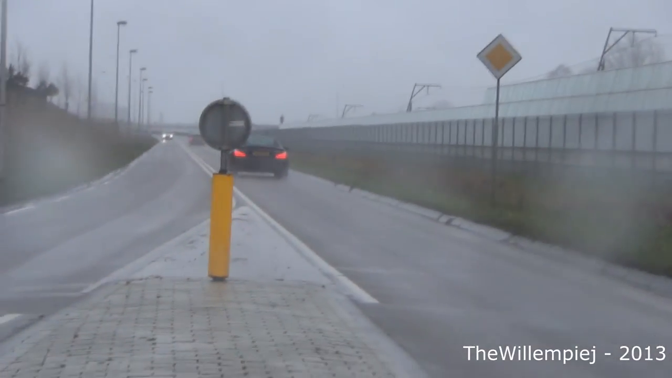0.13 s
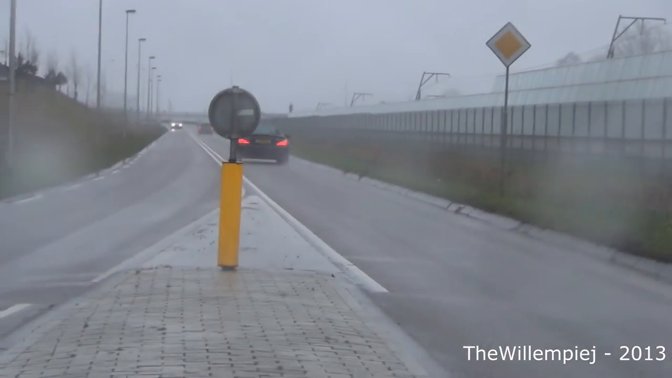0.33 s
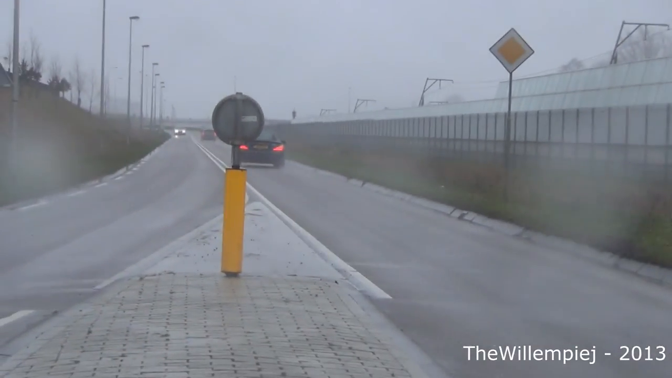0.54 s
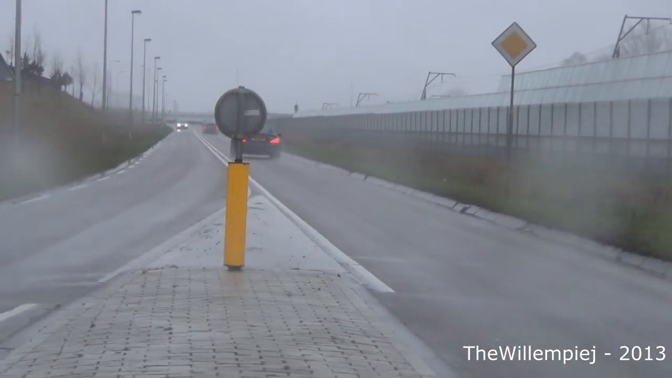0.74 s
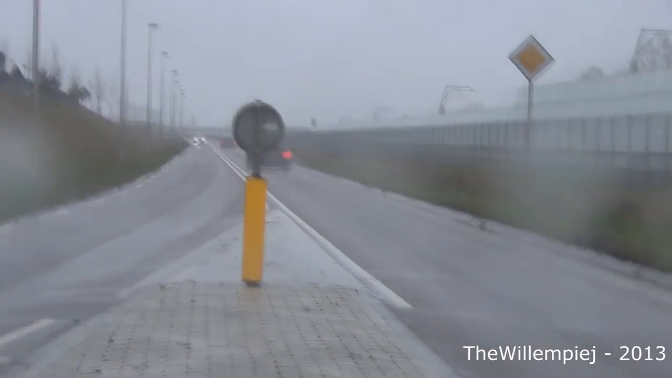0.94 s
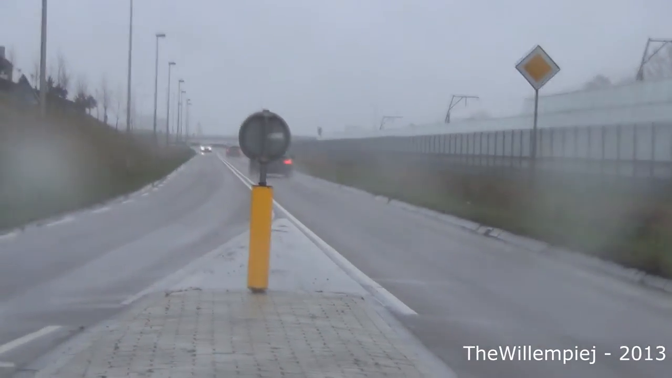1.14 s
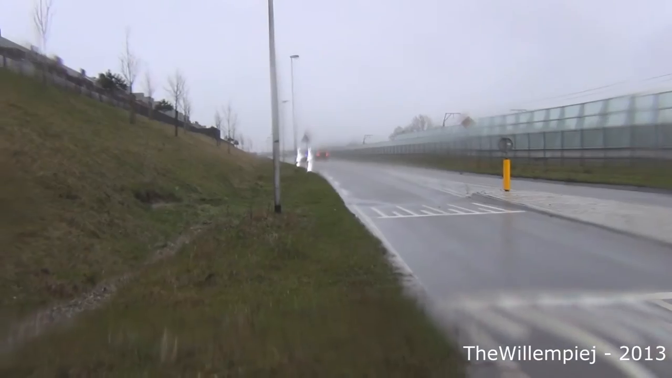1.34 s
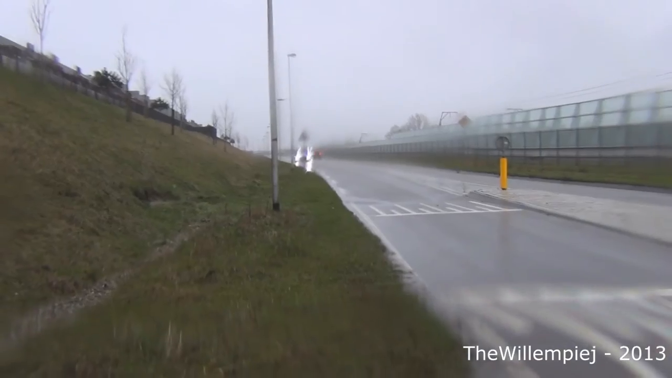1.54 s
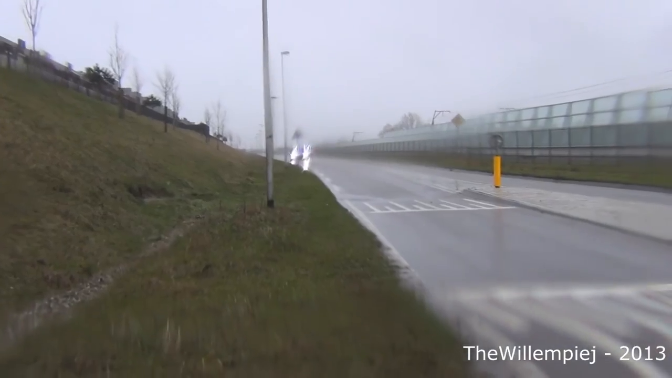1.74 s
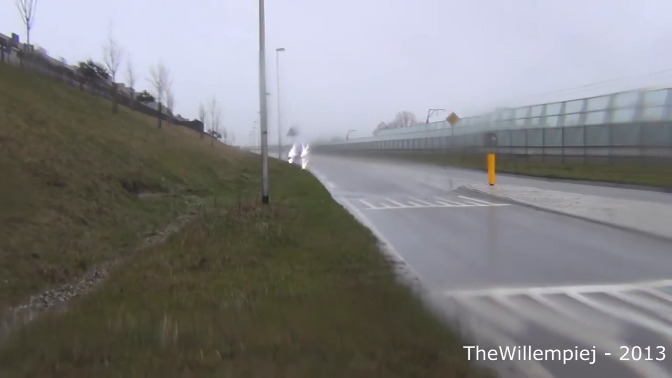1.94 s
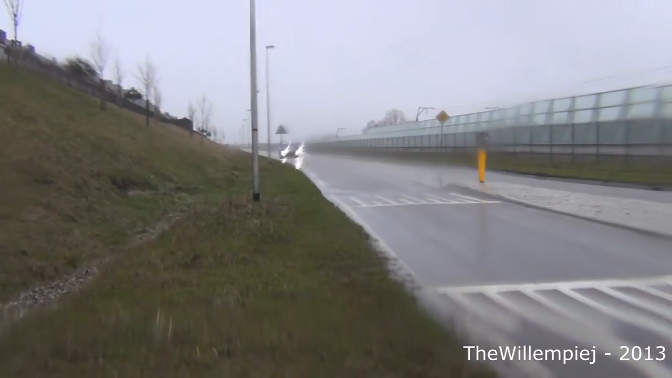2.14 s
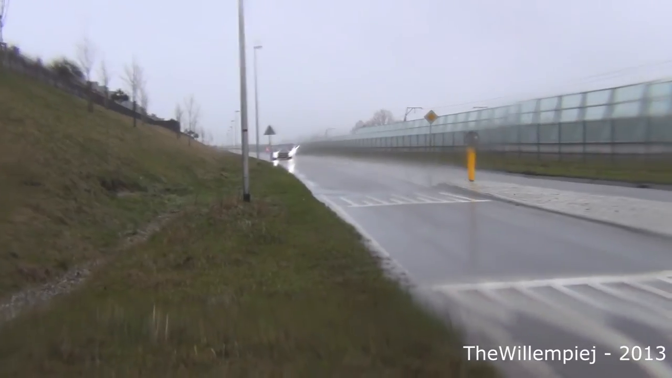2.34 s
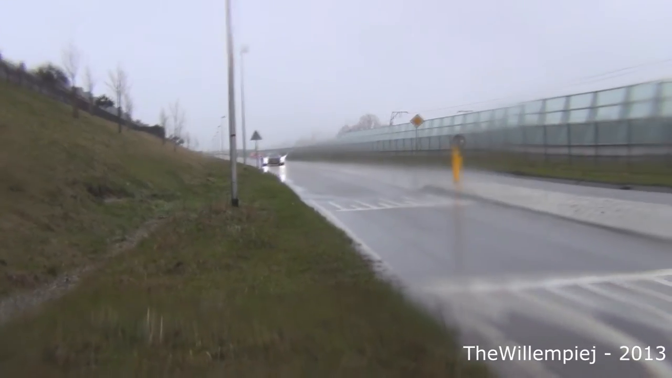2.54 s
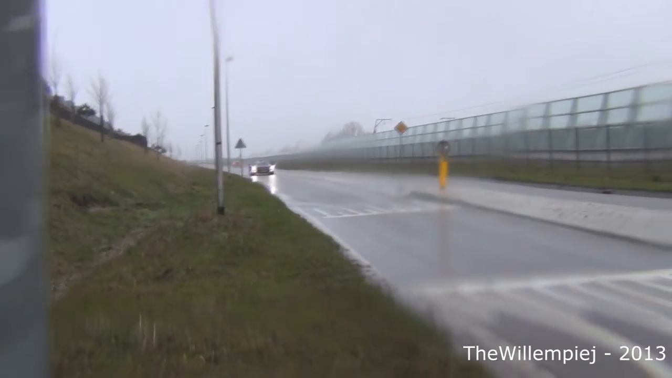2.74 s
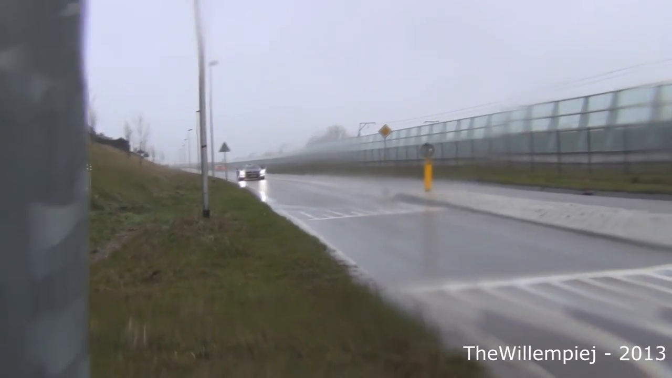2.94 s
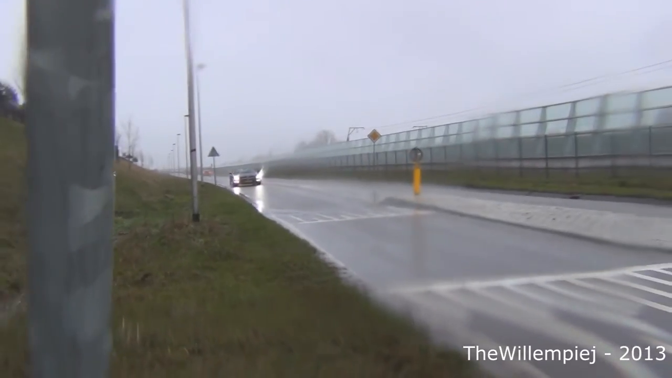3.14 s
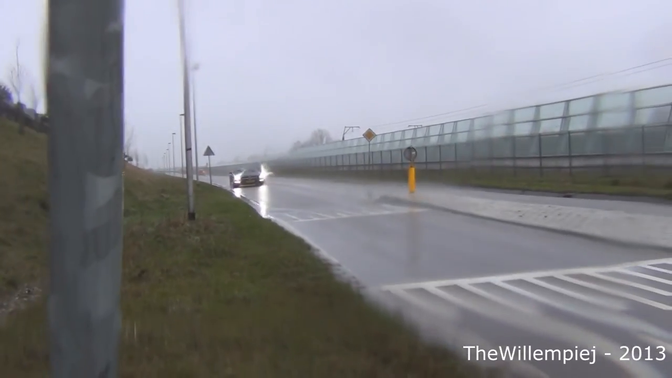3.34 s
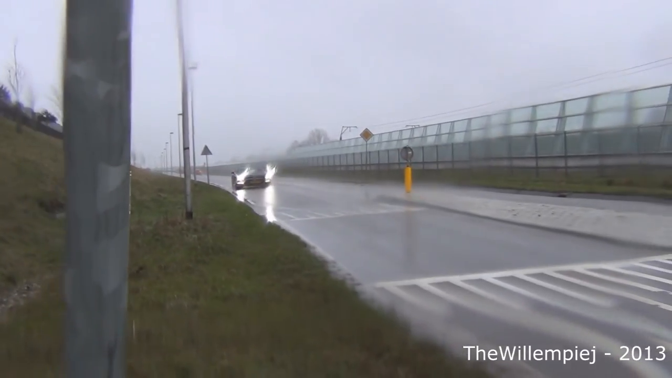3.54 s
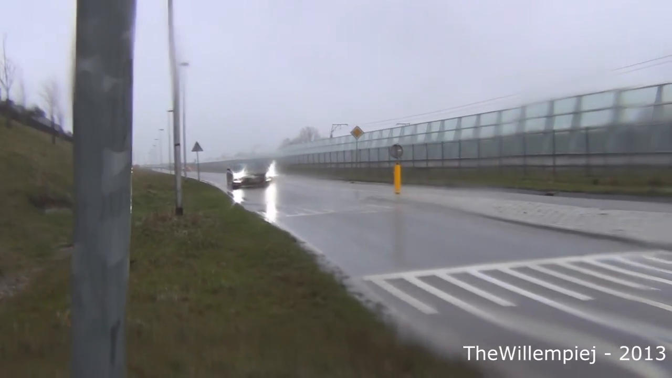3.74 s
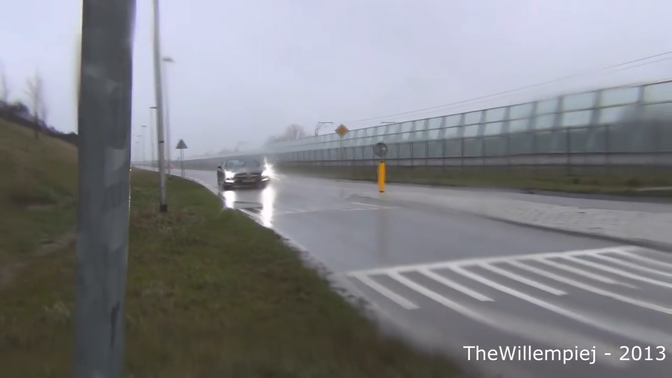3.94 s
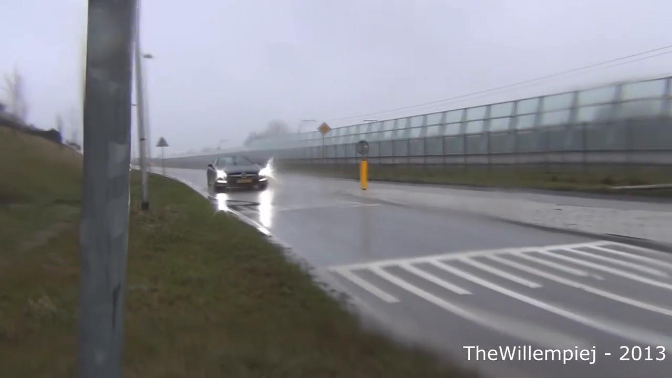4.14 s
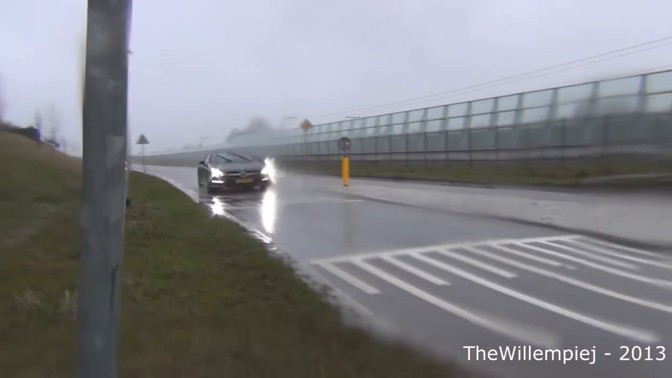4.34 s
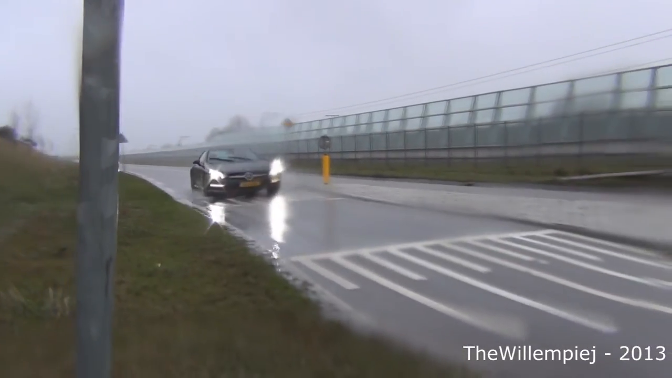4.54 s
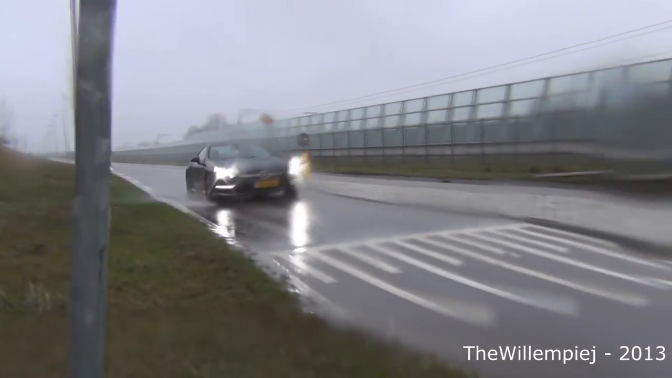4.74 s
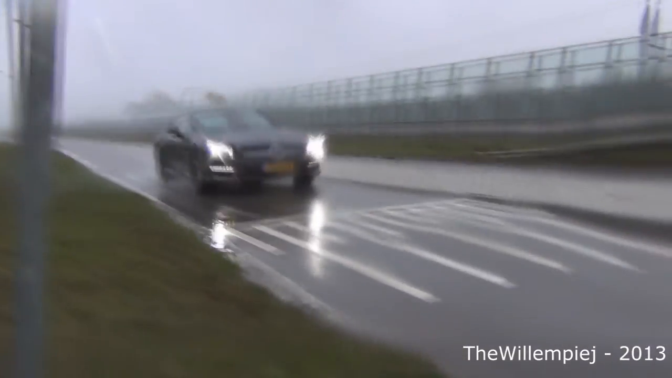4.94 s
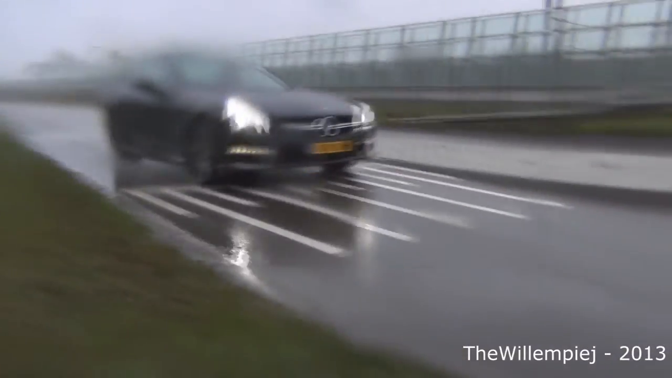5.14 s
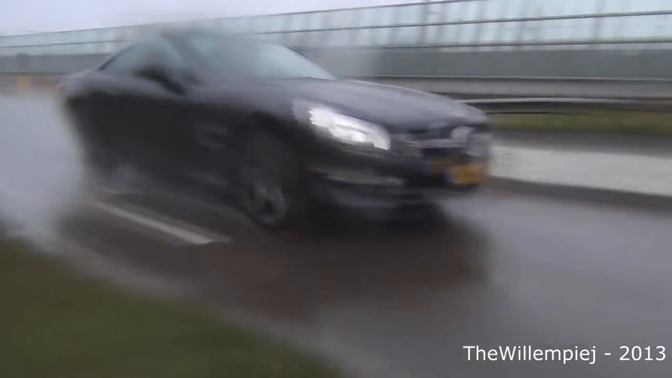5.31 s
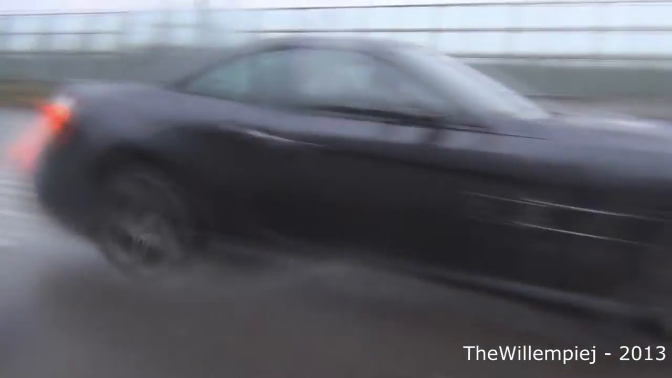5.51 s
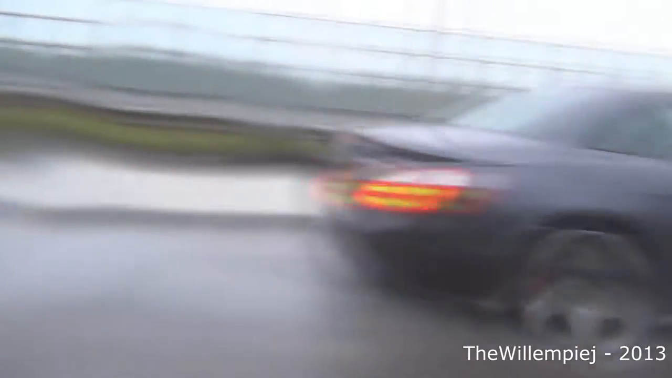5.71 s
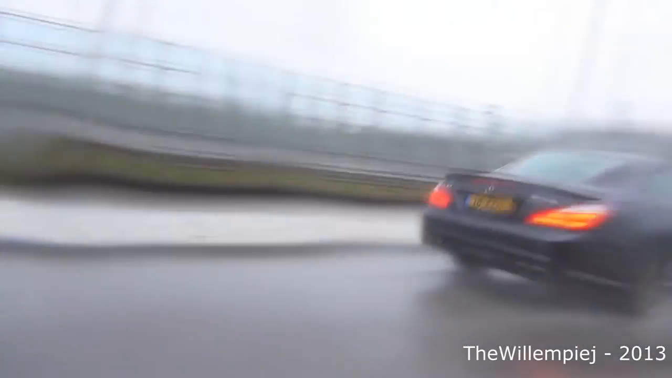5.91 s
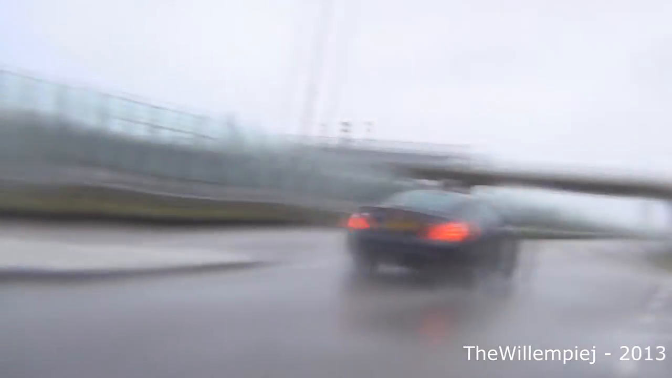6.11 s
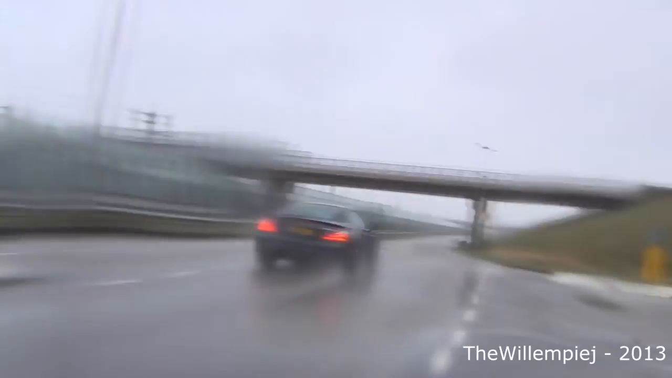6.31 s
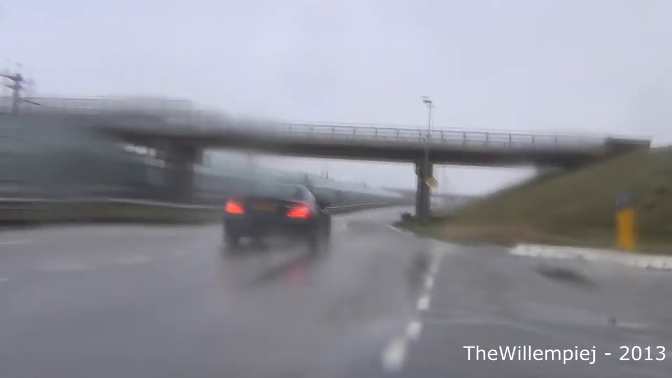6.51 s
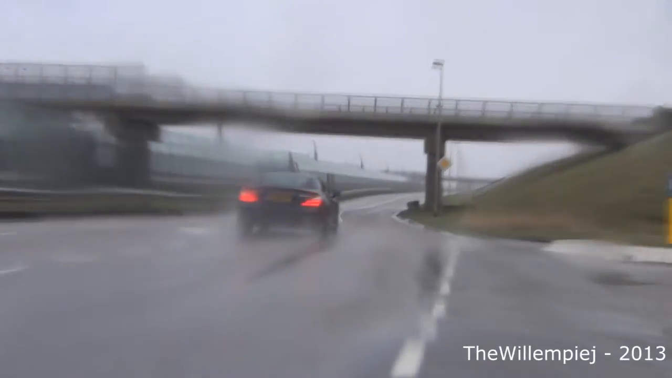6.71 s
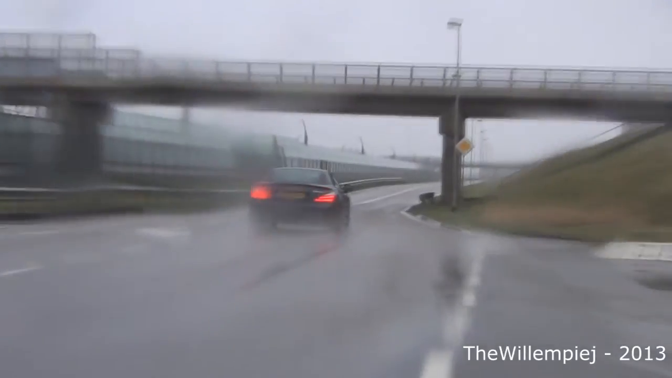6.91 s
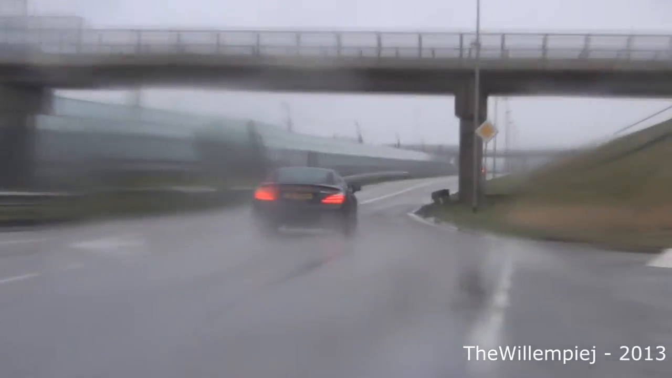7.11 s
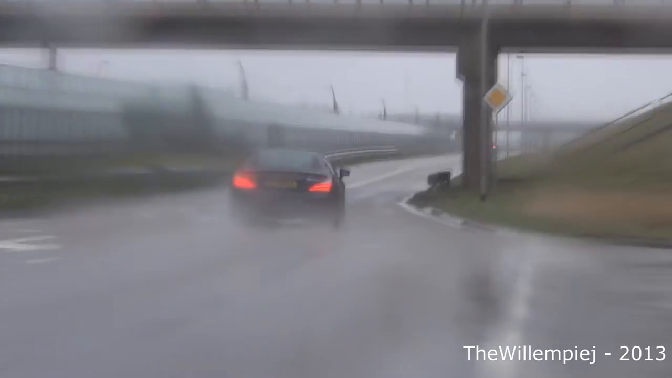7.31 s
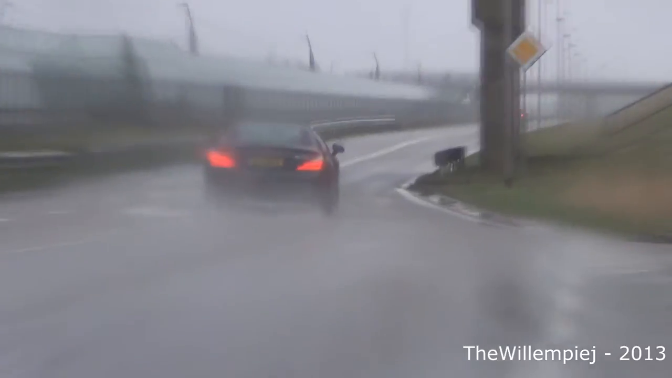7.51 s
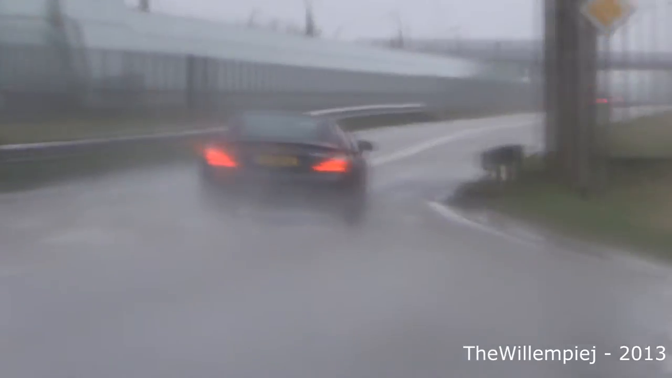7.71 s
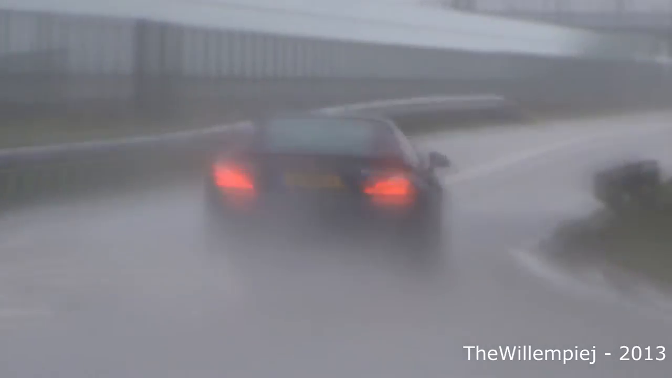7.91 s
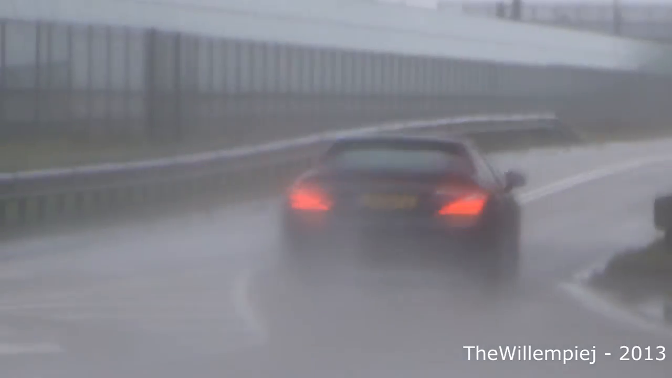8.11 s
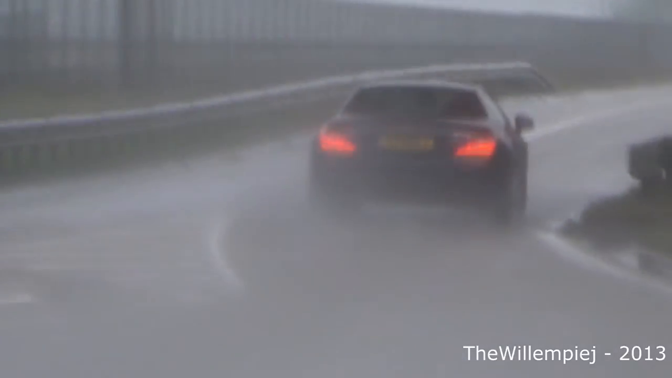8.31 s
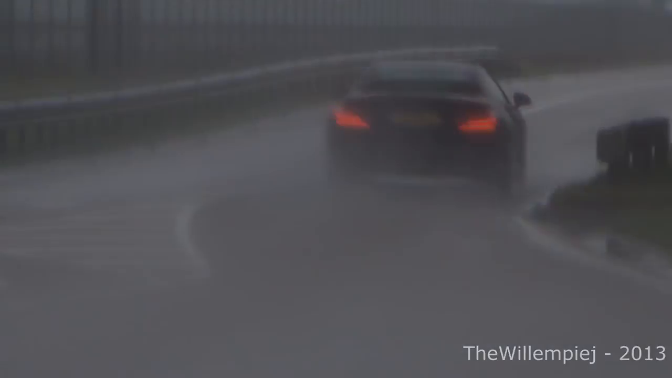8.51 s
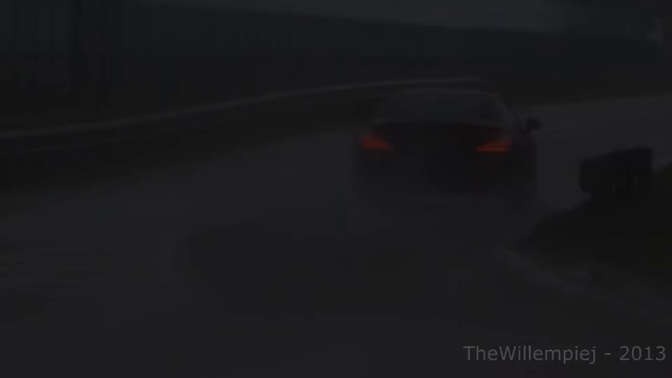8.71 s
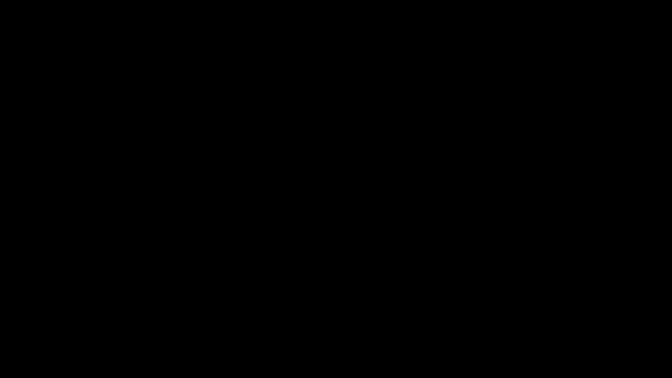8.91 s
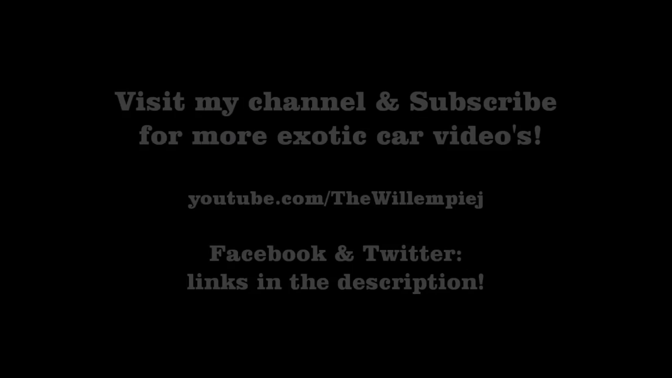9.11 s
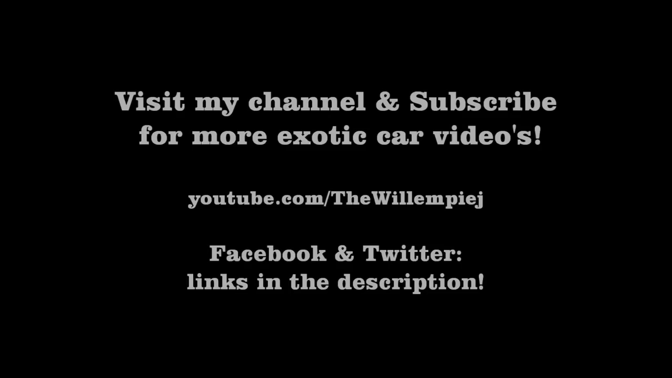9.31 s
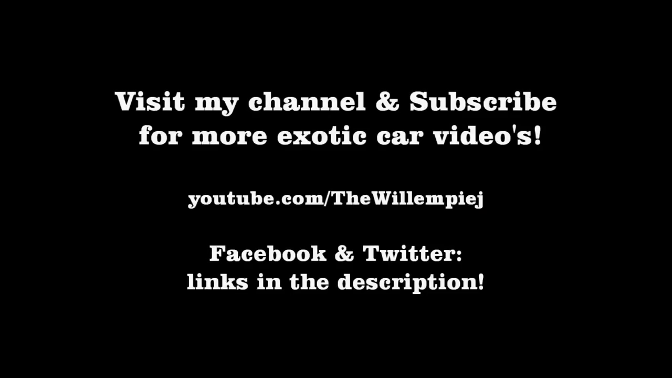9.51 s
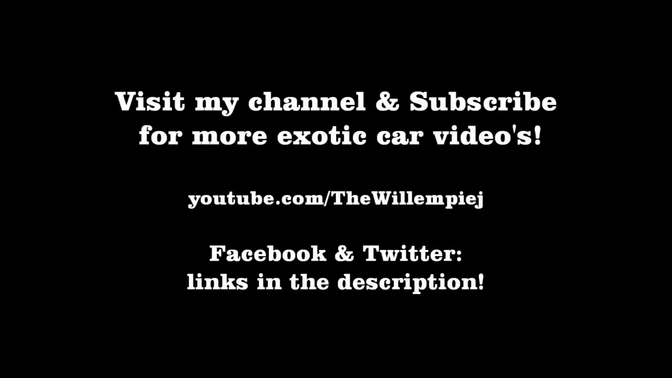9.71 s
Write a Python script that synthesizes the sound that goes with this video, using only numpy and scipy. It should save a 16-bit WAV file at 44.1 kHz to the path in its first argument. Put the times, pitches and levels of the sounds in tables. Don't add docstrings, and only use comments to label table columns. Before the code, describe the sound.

Open wet roadside, light rain, hand-held microphone. From 0 to 1.3 s a powerful eight-cylinder car is already leaving: broad tyre roar and hissing spray, slightly right, with a rough throaty exhaust that dips, then swells. At 1.3 s it cuts abruptly to a much quieter scene: distant wet tyre hiss, low traffic hum and sparse raindrop ticks until about 3.2 s. Wind buffets thump and flutter from 2.6 to 4.7 s while the tyres slowly grow, with a splash at 3.5. A sharp splash comes at 4.7; roar and spray peak near 5.5 s, then a short tyre scrub and rising, stuttering exhaust growl at 5.6-6.3 as wheelspin is caught. Tyre noise drops by 6.7. The car pulls away, splashing at 7.0-7.5 with one hard drop tick at 7.4; rasping revs climb to 8.1, fall with a shift, and fade until a sudden stop at 9 s, then silence.

```python
import sys
import numpy as np
from scipy import signal
from scipy.fft import rfft, irfft, next_fast_len
from scipy.io import wavfile
from scipy.ndimage import uniform_filter1d, map_coordinates

SR = 44100
rng = np.random.default_rng(int(sys.argv[2]) if len(sys.argv) > 2 else 0)


def ratio(d):
    e = np.asarray(d, float) / 20
    return 10 ** e


def log_audio(samples):
    frames = np.atleast_2d(samples).T
    limited = np.clip(frames, -1, 1)
    pcm = np.round(limited * 32767).astype(np.int16)
    wavfile.write(sys.argv[1], SR, pcm)


N = 429970
CHANGE_S, END_S = 1.304, 9.012

# [t/s, tread roar level/dB, spray over roar/dB, left-right bearing/dB]
RECEDING = [
    (0, -22, -4, 1.5),
    (.45, -22.5, -3, 4),
    (.78, -23, -2.5, 6.5),
    (.88, -21.5, -3.5, 8),
    (1.17, -18.5, -5.5, 7.5),
    (1.302, -19.5, -5, 6.5),
]
DRIVE_BY = [(1.305, -32, -8, -0.5), (1.54, -34, -9.5, 0.5), (2.7, -32, -5.5, 1.5), (3.82, -29, -9, 1),
            (4.35, -27.5, -3.5, 2), (4.625, -23.5, -5, 2.5), (4.64, -23, -3, 1.5), (5.02, -20, -1, 2.5),
            (5.53, -18.5, 0.5, 2.5), (5.64, -20, -1.5, 3), (6.05, -19.5, -0.5, -5), (6.45, -22.5, -3, 0),
            (6.71, -28.5, -6, -0.5), (7.2, -28, -4, 0.5), (7.96, -29, -9.5, 1.5), (8.09, -24, -7.5, 0),
            (8.3, -32, -6, 1), (9.012, -36.5, -9, -1)]
# [t/s, extra spray level/dB, half length/s]
PUDDLES = [
    (.62, 2.5, 0.17),
    (1.002, 3, .04),
    (1.276, 2, .02),
    (3.501, 5, .17),
    (4.049, 1, 0.16),
    (4.668, 5, 0.014),
    (7.022, 7, 0.085),
    (7.418, 7, .06),
    (7.55, 6, .06),
]
PUDDLE_ROAR = .35
# [t/s, f/Hz, level/dB]
GROUND = [(0, 1290, 1), (.63, 1450, 4), (1.302, 1527, 0), (1.43, 1600, 4), (2.12, 1635, 9),
          (2.74, 1870, 13.5), (3.24, 2010, 8), (3.77, 1510, 3.5), (4.5, 1647, 9.5), (5.25, 1814, 5),
          (5.41, 1530, 3), (5.62, 2154, 3.5), (6.01, 1540, 2), (6.71, 1440, 1), (7.4, 1740, 2.5),
          (7.9, 2300, 6), (8.3, 1500, 6), (9.012, 1465, 4.5)]
TILT_DB, TILT_PER_DB = -0.86, 0.25
# [t/s, share]
WALL = [(0, 0.13), (1.3, 0.07), (1.6, 0.17), (3.2, 0.18), (3.8, 0.063), (4.5, 0.083), (5.2, 0.059),
        (9, 0.047)]
WALL_S = 0.002464
# [f/Hz, level/dB per Hz]
RUMBLE = [(41, -60), (70, -26.5), (177, -9), (363, -8.5), (593, -5.5), (792, -21.5), (900, -6),
          (1170, -26.5), (1980, -120)]
ROAR = [(290, -47.5), (500, -16.5), (629, -3.5), (837, -0.5), (1240, -2.5), (1610, -4), (1840, -6),
        (2690, -3), (3540, -11.5), (4500, -11.5), (5850, -18), (9900, -120)]
SPRAY = [(1940, -28.5), (3300, -4), (4330, -6), (5300, -1), (7300, 0), (10500, -17.5), (13600, -40.5),
         (22000, -120)]
MIST = [(5290, -25), (9000, -2), (14700, -26.5), (15600, -37)]
# [f/Hz, left-right likeness]
ALIKE = [(60, 0.64), (130, 0.91), (290, 0.89), (640, 1), (1410, 0.97), (3100, 1), (6820, 0.94), (15000, 1)]
# (t/s, half length/s, f/Hz, width/Hz, level/dB)
SLIP = (5.635, .045, 2700, 250, -20)
RUMBLE_DB, RUMBLE_BEHIND_DB = -21.5, 9
RUMBLE_FIRST_DB = -5
SPRAY_FULL_DB, SPRAY_PAN = -25.5, .4
SPRAY_HZ, SPRAY_HZ_PER_DB = 6860, 27.5
SPRAY_PEAK_DB = (1, 5.5)
MIST_DB, MIST_GROWS = -11, 1.37
MIST_AHEAD_DB, MIST_FIRST_DB = 4.5, -4.5
ABREAST_S, TURN_S = 5.58, .06

# [t/s, cycle f/Hz, tailpipe level/dB, tailpipe note f/Hz, roughness 0-1, high when firing is cut]
LEAVING = [
    (0, 24.82, -31, 585, 0.44),
    (.4, 25.63, -40, 584, 0.39),
    (.9, 27.38, -36, 578, 0.18),
    (1.1, 28.6, -26.5, 584.4, .3),
    (1.302, 29.34, -21.5, 585, 0.3),
]
PASSING = [(5.2, 28, -46, 657, .08), (5.28, 27.82, -31, 652, .08), (5.46, 28.2, -25.5, 655, 0.095),
           (5.531, 30.3, -37.5, 657, .2), (5.63, 33.44, -21, 660.2, .65), (5.81, 24.34, -17, 640, .55),
           (5.88, 25.49, -31.5, 619.6, 0.62), (5.96, 27.64, -24, 642, 0.445),
           (6.02, 25.2, -23.5, 657.6, 0.39), (6.16, 26.95, -22.5, 627, 0.35),
           (6.28, 22.93, -30, 590.4, 0.22), (6.36, 22.9, -36.5, 570, 0.36)]
PULLING = [(6.6, 23.1, -52, 496, 0.32), (6.92, 24.43, -34, 520, 0.57), (7.3, 26, -35, 537, 0.31),
           (7.4, 26.9, -24.5, 553, 0.31), (7.62, 27.77, -30, 568, .25), (7.8, 29.38, -26, 597.7, 0.27),
           (7.94, 31.9, -28.5, 621, 0.29), (8.0, 34.1, -25.5, 560.5, 0.56), (8.09, 35.96, -27.5, 550, .55),
           (8.18, 33.46, -27, 557, 0.59), (8.31, 24.3, -45, 574, 0.43), (9.012, 22.87, -41.5, 598, 0.37)]
# [multiple of the cycle, level/dB]
ORDER = [(4, -16.5), (6, -6.5), (7, -8.5), (9, -11.5), (10, -4), (12, -6.5), (13, -7.5), (14, -3.5),
         (15, -8), (16, -7)]
# [t/s, rasp level/dB, firing tone level/dB]
EXHAUST = [(0, -30, -63), (.9, -33.5, -48), (1.302, -35, -51), (1.306, -90, -97), (5.15, -63.5, -56),
           (5.44, -63, -64), (5.65, -37, -44), (5.85, -36, -49), (6.0, -40.5, -40.5), (6.27, -33, -35.5),
           (6.7, -36.5, -46), (7.3, -34, -52), (7.65, -31, -44), (7.98, -28.5, -49), (8.09, -28.5, -37),
           (8.3, -39.5, -53), (9.012, -47.5, -56)]
# [f/Hz, width/Hz, level/dB]
RASP = [(976, 170, 5), (1476, 170, 4.5), (2520, 120, 1.5)]
# [t/s, f/Hz, level/dB]
BANK = [
    (5.35, 102.5, -62),
    (5.45, 105, -55),
    (5.63, 133, -48),
    (5.82, 96.1, -50),
]
# [t/s, f/Hz, level/dB]
INTAKE = [
    (5.2, 281, -48),
    (5.26, 280, -42),
    (5.43, 281, -43),
    (5.48, 282, -49),
]
# (t/s, half length/s, level/dB)
SIDE_ON = (5.73, .13, 5.1)
WIDTH_HZ = 120
LOW_DB, LOW_ROUGH_DB = -9, 4.5
THUD_DB = -9.5

# [t/s, level/dB, brightness/dB]
GUSTS = [(0.873, -23, 6), (2.555, -31.5, -10), (2.663, -27.5, -2), (2.684, -25, 7), (2.913, -23.5, -1),
         (3.011, -22, -5), (3.077, -30, 0), (3.129, -23.5, 1), (3.146, -27, 3), (3.209, -38.5, -18),
         (3.356, -25, -7), (3.377, -35, -4), (3.546, -28, 6), (3.581, -24, -6), (3.681, -28, -1),
         (3.829, -26, 6), (3.859, -26, -8), (3.909, -20.5, 2.5), (3.97, -22, 8), (4.05, -32, 6),
         (4.088, -26.5, 6), (4.144, -25, 6), (4.183, -22.5, -1), (4.267, -24, -4), (4.282, -18.5, 6),
         (4.302, -28.5, 6), (4.475, -30.5, 6), (4.5, -22.5, -5), (4.592, -21.5, 7), (4.611, -23, 1)]
# [t/s, level/dB, length/ms, brightness/dB]
SWELLS = [
    (2.81, -36, 42, -2.5),
    (3.03, -25, 25, 2),
    (3.52, -28.5, 56, 5),
    (3.635, -24.5, 21, -2),
    (3.85, -31, 33, -2.5),
    (4.17, -34, 30, -2.5),
    (4.66, -37.5, 30, 0.5),
    (4.731, -34, 7.3, -5.5),
    (8.729, -32, 9, 2),
]
EDDY_MS = 8.9
# [t/s, level/dB]
BREEZE = [(1.31, -68), (2.2, -58), (2.98, -46.5), (3.4, -54), (4.02, -40), (4.9, -42), (5.15, -49.5),
          (5.6, -60)]
# [f/Hz, level/dB]
DULL = [(50, -36.5), (120, -9), (250, 0.5), (420, 0.5), (700, -11), (1500, -61)]
SHARP = [(250, -43.5), (450, 1.5), (650, 1.5), (950, -4), (1600, -6.5), (3500, -52.5)]
# [t/s, peak level/dB]
DROPS = [
    (1.3428, -25),
    (1.6551, -47),
    (1.9465, -49),
    (1.9813, -44.5),
    (2.0456, -29.5),
    (2.1006, -28),
    (2.1174, -43),
    (3.1093, -37),
    (3.1575, -36.5),
    (7.3868, -23.5),
]
# [f/Hz, level/dB per Hz]
FAR = [(20, -27.5), (60, 1), (110, -3), (180, -1.5), (400, -32.5)]
FAR_DB = -63.5
BASS_CUT_HZ = 55


def unit(x):
    return x / np.sqrt(np.mean(x ** 2) + 1e-20)


def along(points, hz):
    f, v = np.transpose(points)
    return np.interp(np.log(hz + 1), np.log(f + 1), v)


def curves(*tables):
    s, *cols = np.transpose(np.vstack(tables))
    return [np.interp(np.arange(N) / SR, s, c) for c in cols]


def bump(s, half_s):
    return np.exp(-((np.arange(N) / SR - s) / half_s) ** 2)


def wobble(rate):
    steps = np.arange(0, N + 16, 16)
    values = rng.standard_normal(int(N * rate / SR) + 5)
    knots = map_coordinates(values, [steps * rate / SR])
    return np.interp(np.arange(N), steps, knots)


def filtered(x, response):
    m = next_fast_len(N + SR // 4)
    return irfft(rfft(x, m) * response(np.fft.rfftfreq(m, 1 / SR)), m)[..., :N]


def panned(x, pan_db):
    return x * ratio(np.array([pan_db, -pan_db]) / 2)


def rush(spectrum, patchy_db, grains=1, peak_hz=None, peak_db=None, octaves=.4, tilt=None):
    hz, t, z = signal.stft(grains * rng.standard_normal((2, N)), SR, nperseg=512)
    patches = uniform_filter1d(rng.standard_normal(z.shape[1:]), size=4, axis=0)
    field_db = patchy_db * unit(uniform_filter1d(patches, size=12, axis=1))
    now = np.minimum((t * SR).astype(int), N - 1)
    if peak_hz is not None:
        distance = np.log2((hz[:, None] + 1) / peak_hz[now]) / octaves
        field_db += peak_db[now] * np.exp(-distance ** 2)
    if tilt is not None:
        field_db += tilt[now] * np.log2(np.clip(hz[:, None], 500, 4000) / 1600)
    pair = signal.istft(z * ratio(field_db), nperseg=512)[1][:, :N]

    def mid_side(f):
        angle = np.arccos(np.clip(along(ALIKE, f), -1, 1)) / 2
        return ratio(along(spectrum, f)) * [np.cos(angle), np.sin(angle)]

    mid, side = filtered(pair, mid_side)
    return unit(np.array([mid + side, mid - side]))


def behind():
    t = np.arange(N) / SR
    return np.where(t < CHANGE_S, 1, .5 + .5 * np.tanh((t - ABREAST_S) / TURN_S))


def tyres():
    first = np.arange(N) / SR < CHANGE_S
    roar_db, wet_db, pan = curves(RECEDING, DRIVE_BY)
    splash_db = sum(db * bump(s, half) for s, db, half in PUDDLES)
    spray_db = roar_db + wet_db + splash_db
    roar_db = roar_db + PUDDLE_ROAR * splash_db
    over_full_db = spray_db - SPRAY_FULL_DB
    mist_db = SPRAY_FULL_DB + MIST_DB + MIST_GROWS * over_full_db
    mist_db += MIST_FIRST_DB * first - MIST_AHEAD_DB * behind()
    rumble_db = roar_db + RUMBLE_DB + RUMBLE_BEHIND_DB * behind() + RUMBLE_FIRST_DB * first

    ground_hz, ground_db = curves(GROUND)
    roar = rush(ROAR, patchy_db=1.35, peak_hz=ground_hz, peak_db=ground_db, octaves=0.44,
                tilt=TILT_DB + TILT_PER_DB * ground_db)
    roar = roar + curves(WALL)[0] * np.roll(roar, round(WALL_S * SR), axis=1)
    droplets = ratio(1.0 * wobble(700) + 0.56 * wobble(40))
    spray = rush(SPRAY, patchy_db=1.5, grains=droplets, peak_hz=SPRAY_HZ + SPRAY_HZ_PER_DB * over_full_db,
                 peak_db=np.where(first, *SPRAY_PEAK_DB), octaves=0.65)
    mist = rush(MIST, patchy_db=1.2, grains=droplets)
    rumble = ratio(rumble_db) * rush(RUMBLE, patchy_db=2.5)
    water = ratio(spray_db) * spray + ratio(mist_db) * mist
    return rumble + scrub() + panned(ratio(roar_db - 1.5) * roar, pan) + panned(water, SPRAY_PAN * pan)


def scrub():
    s, half, hz, width, db = SLIP
    band = filtered(rng.standard_normal(N), lambda f: np.exp(-((f - hz) / width) ** 2))
    return unit(band) * ratio(db) * bump(s, half)


def engine():
    cycle_hz, pipe_db, pipe_hz, rough = curves(LEAVING, [(1.306, 29, -87.5, 601.2, .1)], PASSING, PULLING)
    rough = np.clip(rough, .05, .95)
    width = WIDTH_HZ * rough
    rasp_db, firing_db = curves(EXHAUST)
    low_db = (pipe_db + rasp_db) / 2 + LOW_DB + LOW_ROUGH_DB * rough
    side_s, side_half_s, side_db = SIDE_ON
    low_db += side_db * bump(side_s, side_half_s)
    turns = np.cumsum(cycle_hz) / SR + .002 * wobble(25)

    def order(k, flutter_db):
        return ratio(flutter_db * wobble(9)) * np.sin(2 * np.pi * (k * turns + rng.random()))

    low = unit(sum(ratio(db) * order(k, 2.4) for k, db in ORDER))
    tones = np.sqrt(2) * ratio(firing_db) * order(8, 1.8) + ratio(low_db) * low
    tones = tones + 2 * hum(BANK) + hum(INTAKE)

    near = np.array([1 / (1 + ((k * cycle_hz - pipe_hz) / width) ** 2) for k in range(16, 32)])
    rung = sum(gain * order(k, 1.5) for k, gain in enumerate(near, 16))
    rung = rung * np.sqrt(2 / np.sum(near ** 2, axis=0))
    swing = map_coordinates(rng.standard_normal(4000), [np.cumsum(2.5 * width) / SR])
    blown = unit(swing * np.sin(2 * np.pi * np.cumsum(pipe_hz) / SR))
    pipe = np.sqrt(1 - rough ** 2) * rung + rough * blown
    pipe *= 1 + .45 * np.sin(2 * np.pi * turns)

    puffs = (1 + 0.56 * np.sin(2 * np.pi * 8 * turns)) * ratio(0.81 * wobble(45)) * rng.standard_normal(N)
    rasp = unit(filtered(filtered(puffs, resonances(RASP)), resonances(RASP)))
    thuds = unit(filtered(puffs, lambda f: ratio(along(DULL, f))))
    thuds = ratio(pipe_db + THUD_DB) * rough * thuds
    exhaust = thuds + ratio(pipe_db - 3.5) * pipe + ratio(rasp_db) * rasp
    return panned(tones + exhaust, 0.27 * curves(RECEDING, DRIVE_BY)[2])


def hum(rows):
    first, last = rows[0], rows[-1]
    hz, db = curves([(first[0] - .04, first[1], -90)], rows, [(last[0] + .04, last[1], -90)])
    return np.sqrt(2) * ratio(db + 1.2 * wobble(5)) * np.sin(2 * np.pi * np.cumsum(hz) / SR)


def resonances(modes):
    def response(f):
        total = 0
        for k, (centre, width, db) in enumerate(modes):
            damping = 1j * f * width
            total = total + (-1) ** k * ratio(db) * damping / (centre * centre - f * f + damping)
        return total
    return response


def wind():
    t = np.arange(N) / SR
    breeze_db, = curves([(1.302, -90)], BREEZE)
    dull = ratio(breeze_db + 2 + 3.5 * wobble(60))
    sharp = 0.76 * dull
    short = [(s, db, EDDY_MS, bright) for s, db, bright in GUSTS]
    for s, db, ms, bright_db in short + list(SWELLS):
        near = slice(round(s * SR) - 3000, round(s * SR) + 3000)
        bright_db = min(bright_db, 6)
        eddy = np.exp(-((t[near] - s) / (ms * 0.00077)) ** 2)
        dull[near] += ratio(db - bright_db / 2 - 7) * eddy
        sharp[near] += ratio(db + bright_db / 2 - 5.5) * eddy
    return dull * rush(DULL, patchy_db=1.5) + sharp * rush(SHARP, patchy_db=1.5)


def rain():
    ticks, t = np.zeros(N), np.arange(300) / SR
    for s, db in DROPS:
        decay = ratio(db - 4 - 60 * t / .006)
        ticks[round(s * SR):][:len(t)] += decay * rng.standard_normal(len(t))
    housing = [(3000, -30), (8000, 10), (11000, -1), (16000, -8)]  # f/Hz, level/dB
    return filtered(ticks, lambda f: ratio(along(housing, f)))


def traffic():
    noise = filtered(rng.standard_normal((2, N)), lambda f: ratio(along(FAR, f)))
    return ratio(FAR_DB + 3.3 * wobble(4.3)) * unit(noise)


def scene():
    return tyres() + engine() + wind() + rain() + traffic()


def roll_off(x):
    return signal.sosfilt(signal.butter(12, 15800, fs=SR, output="sos"), x)


def record(dry):
    late = np.arange(N) / SR - END_S
    gate = np.where(late < 0, 1, ratio(-29 - 740 * late) * (late < .036))
    heard = filtered(dry, lambda f: f / np.hypot(f, BASS_CUT_HZ))
    return roll_off(heard * gate)


dry = scene()
out = record(dry)
log_audio(out)
```